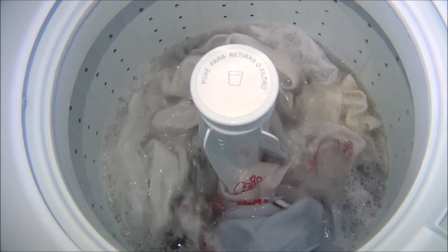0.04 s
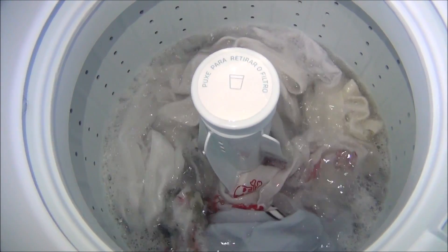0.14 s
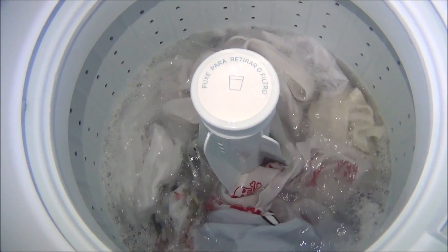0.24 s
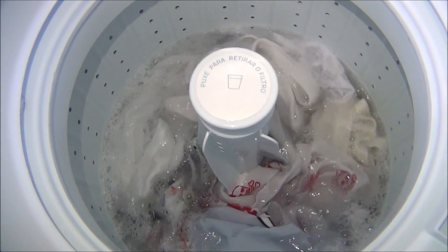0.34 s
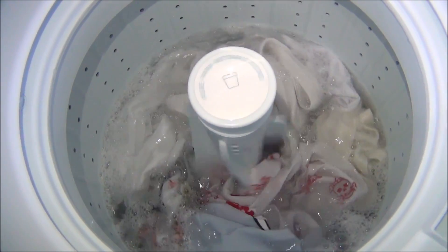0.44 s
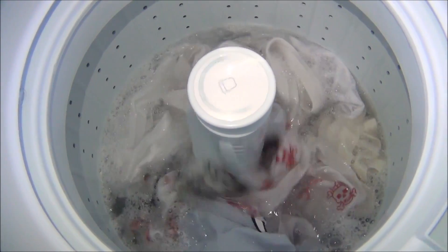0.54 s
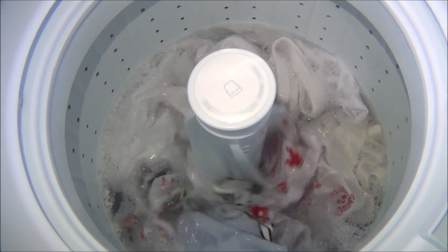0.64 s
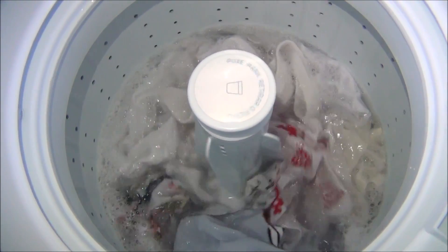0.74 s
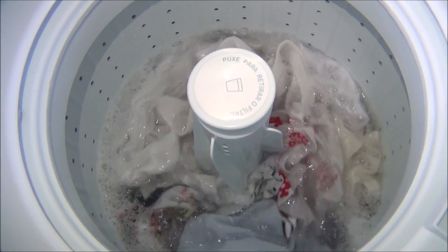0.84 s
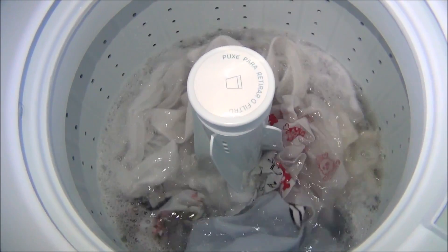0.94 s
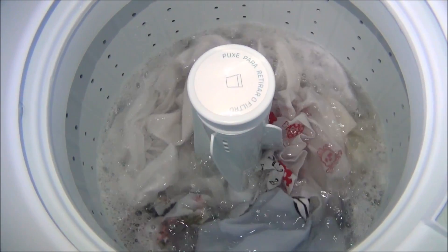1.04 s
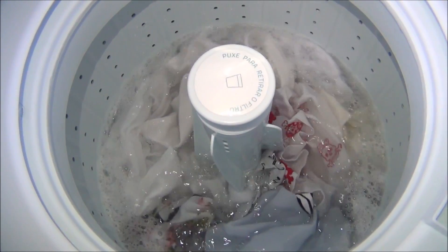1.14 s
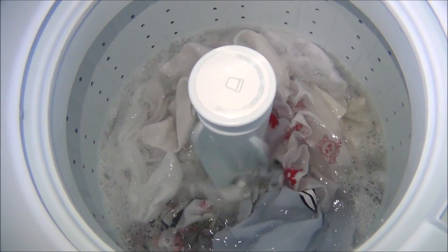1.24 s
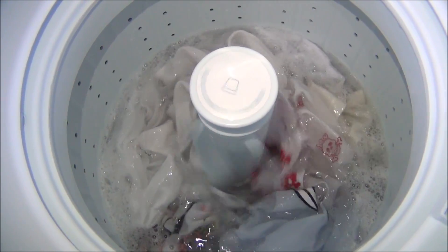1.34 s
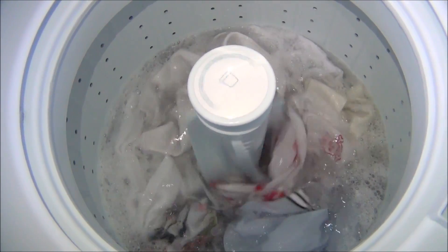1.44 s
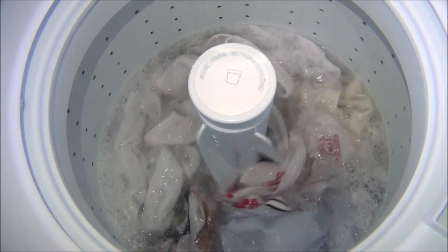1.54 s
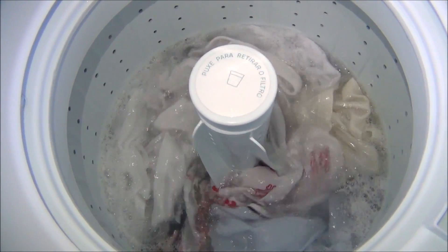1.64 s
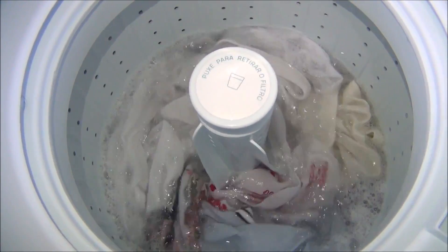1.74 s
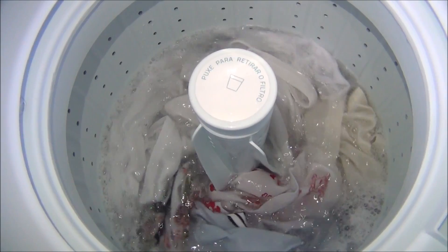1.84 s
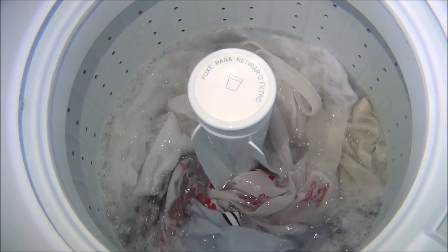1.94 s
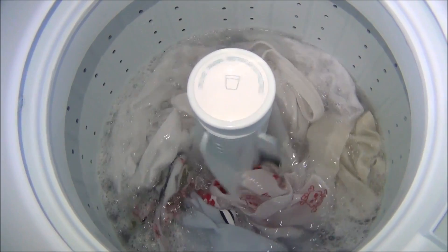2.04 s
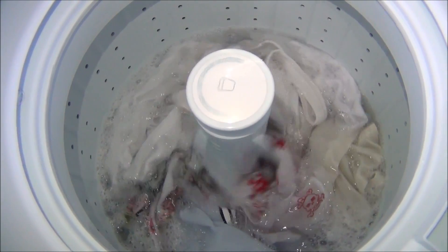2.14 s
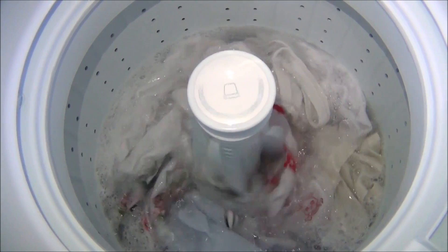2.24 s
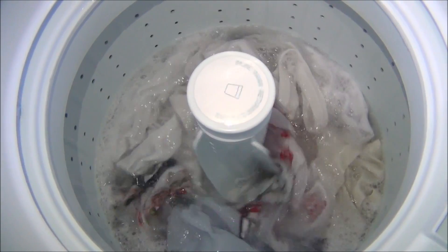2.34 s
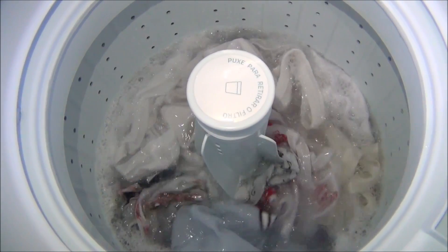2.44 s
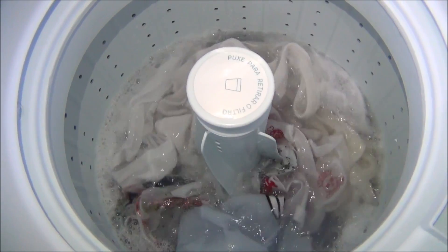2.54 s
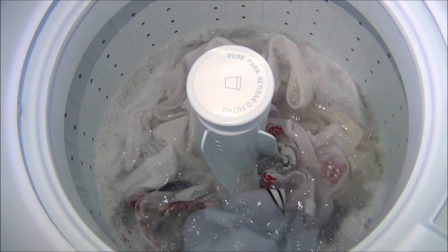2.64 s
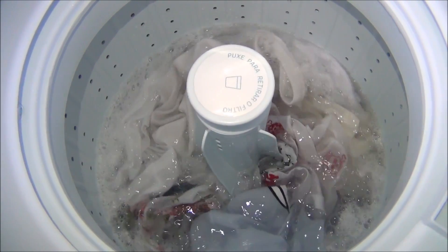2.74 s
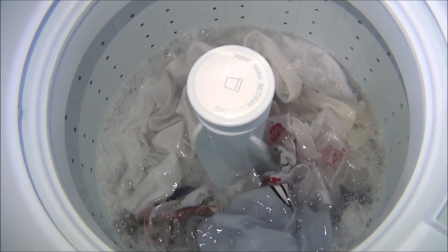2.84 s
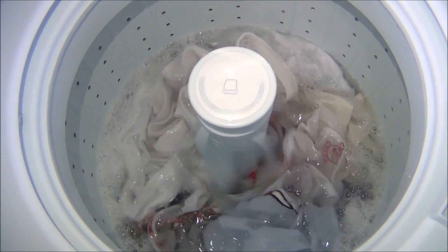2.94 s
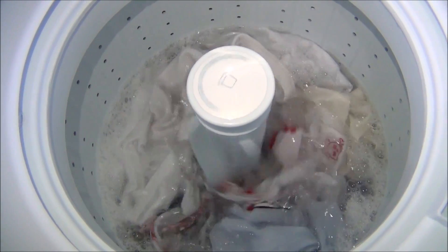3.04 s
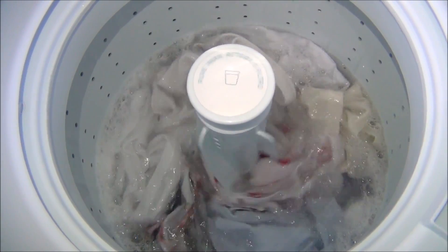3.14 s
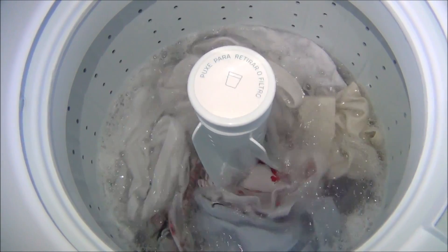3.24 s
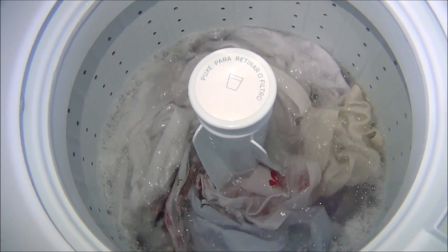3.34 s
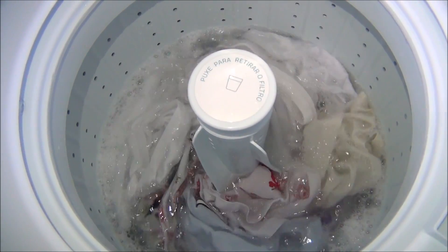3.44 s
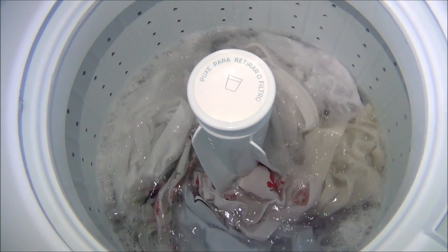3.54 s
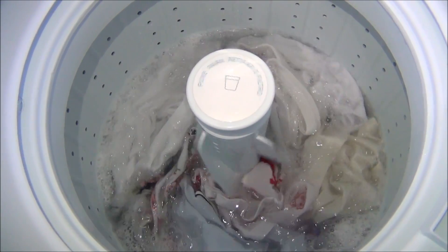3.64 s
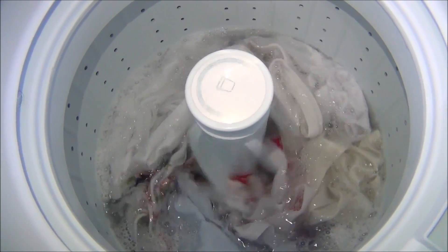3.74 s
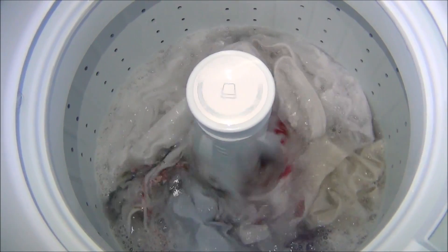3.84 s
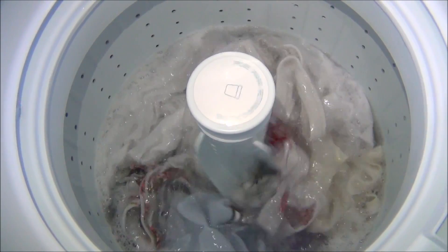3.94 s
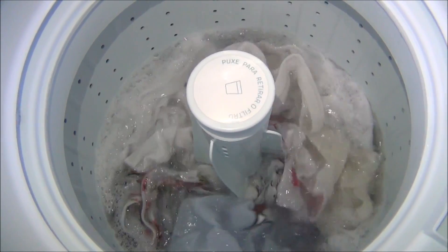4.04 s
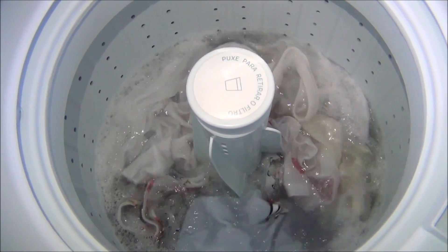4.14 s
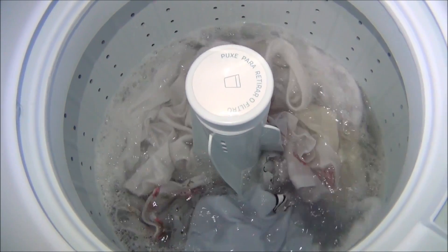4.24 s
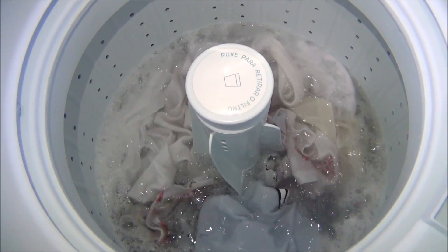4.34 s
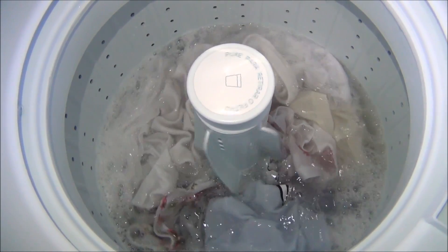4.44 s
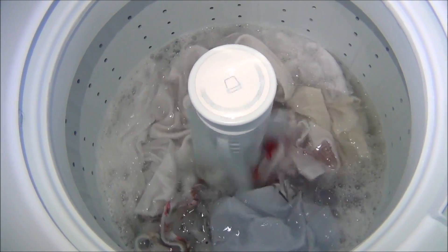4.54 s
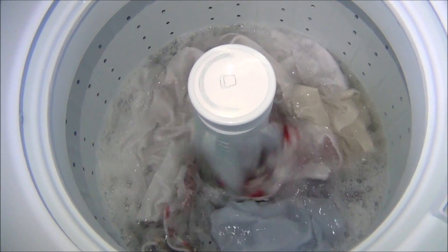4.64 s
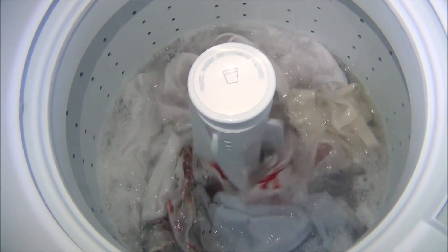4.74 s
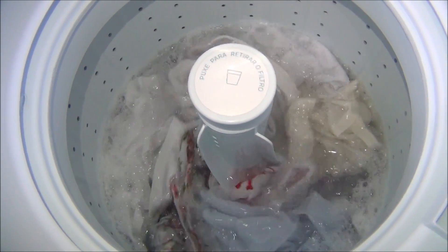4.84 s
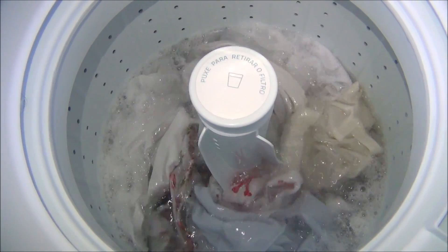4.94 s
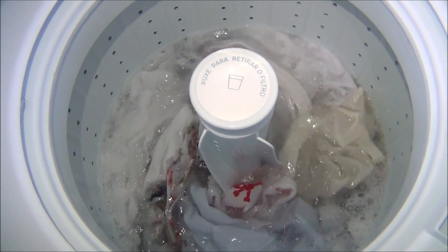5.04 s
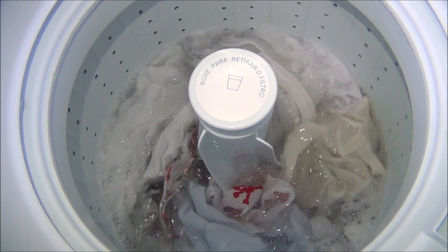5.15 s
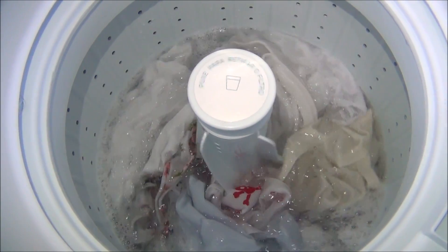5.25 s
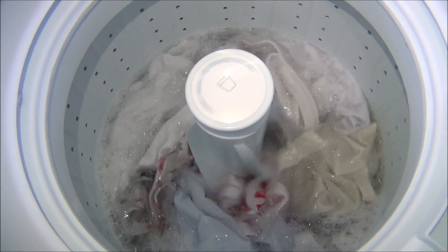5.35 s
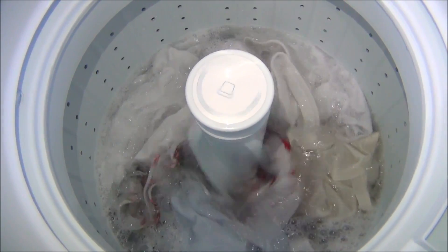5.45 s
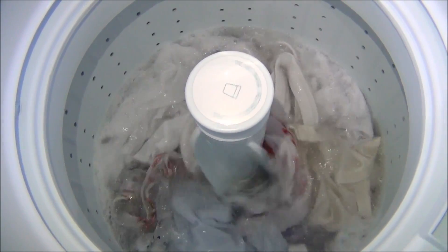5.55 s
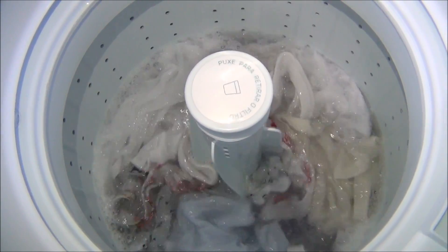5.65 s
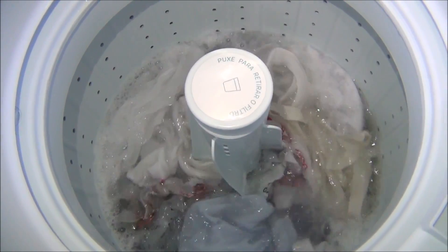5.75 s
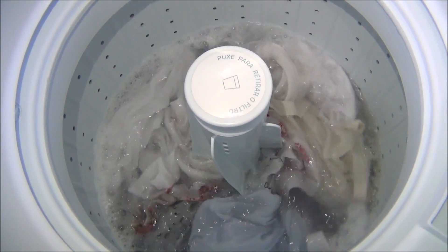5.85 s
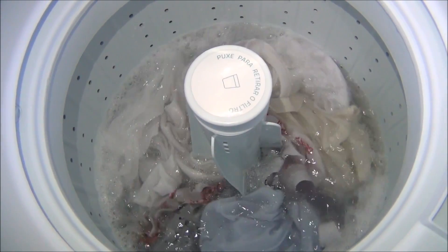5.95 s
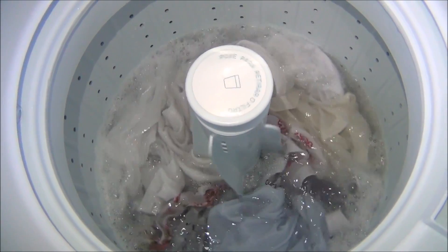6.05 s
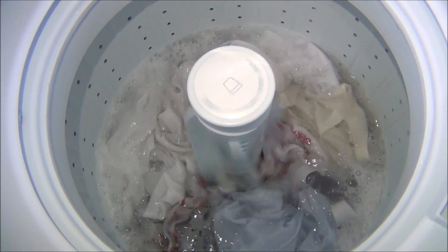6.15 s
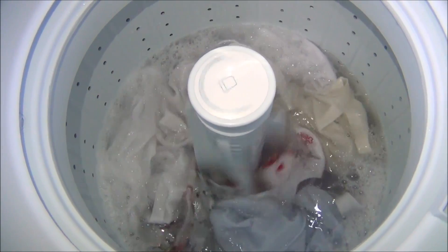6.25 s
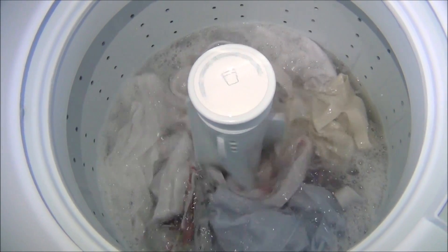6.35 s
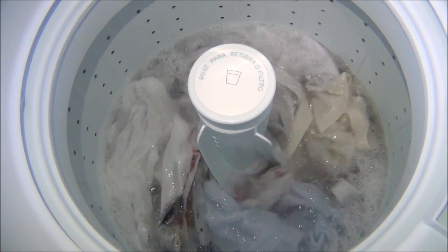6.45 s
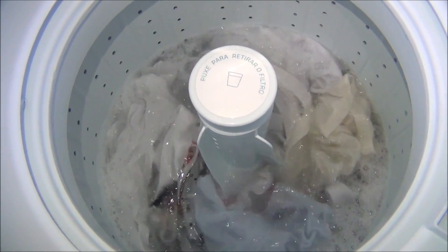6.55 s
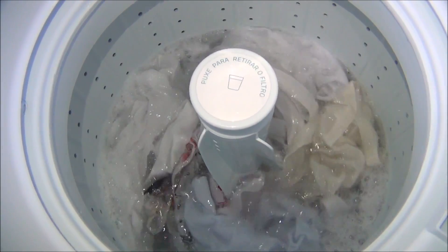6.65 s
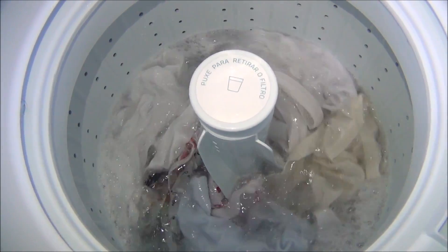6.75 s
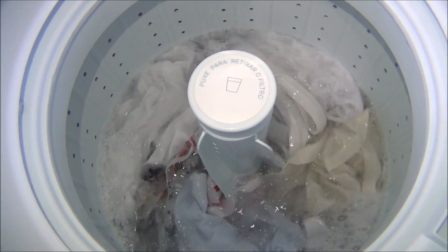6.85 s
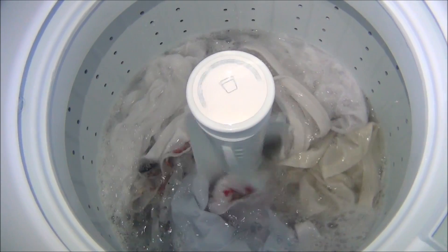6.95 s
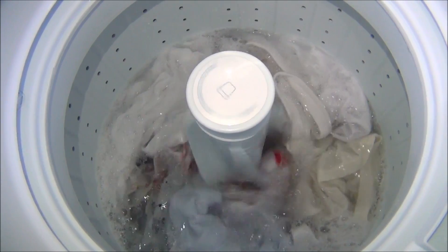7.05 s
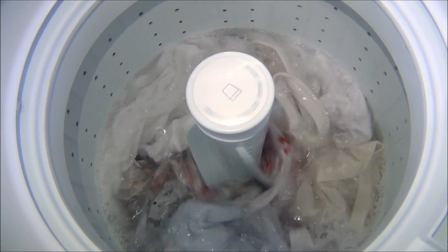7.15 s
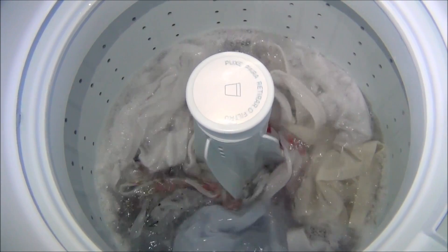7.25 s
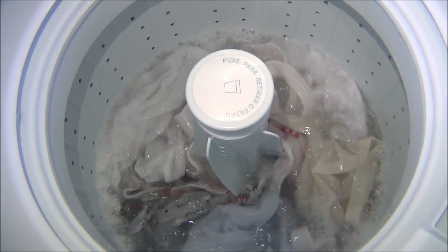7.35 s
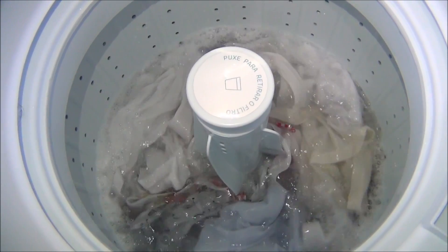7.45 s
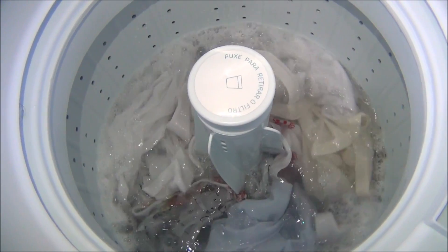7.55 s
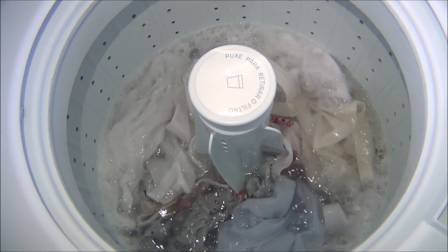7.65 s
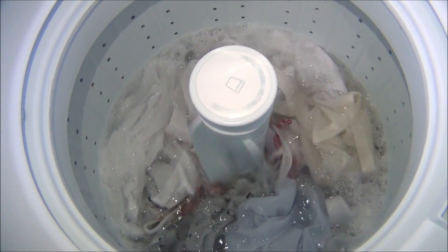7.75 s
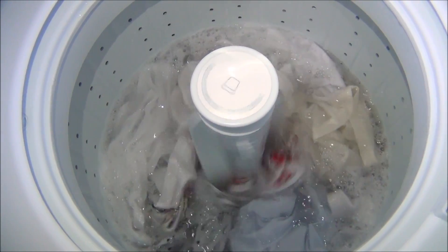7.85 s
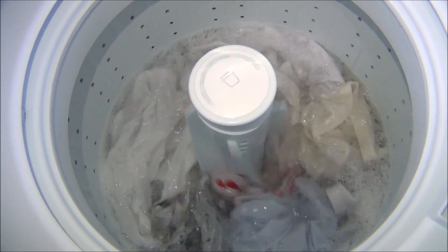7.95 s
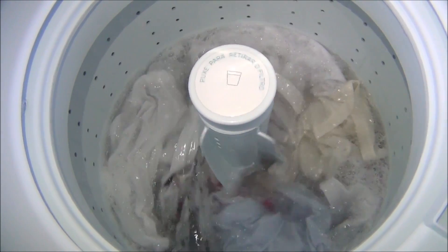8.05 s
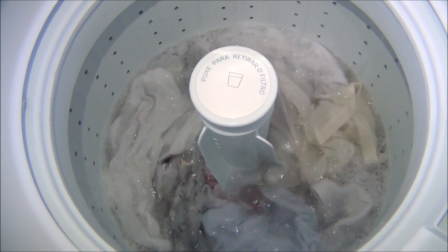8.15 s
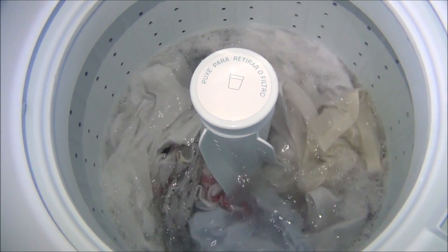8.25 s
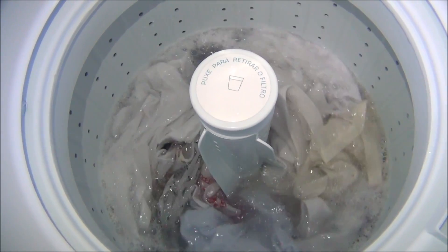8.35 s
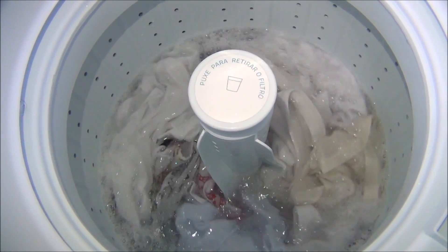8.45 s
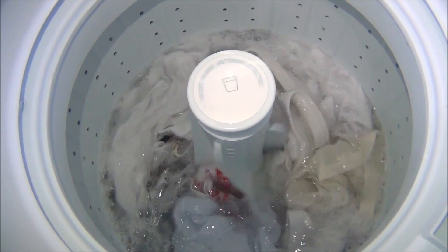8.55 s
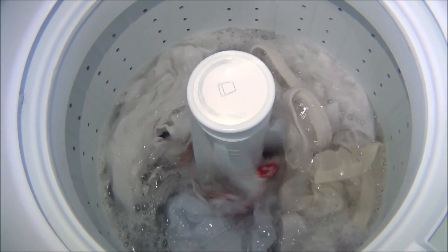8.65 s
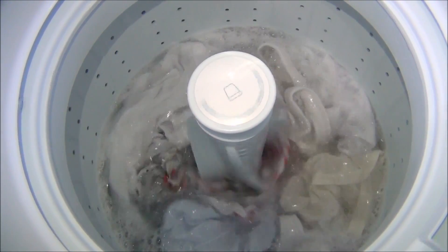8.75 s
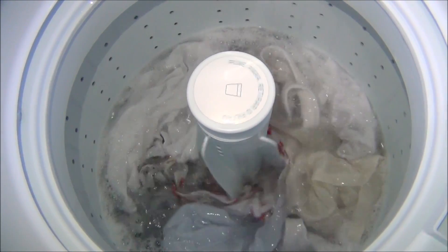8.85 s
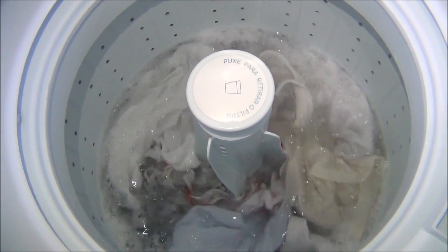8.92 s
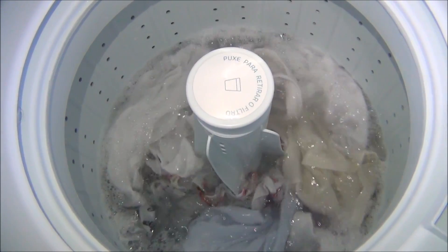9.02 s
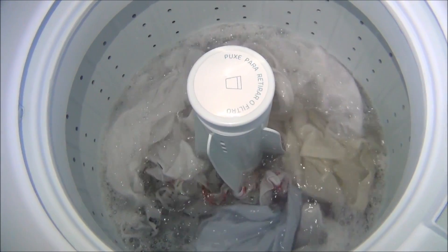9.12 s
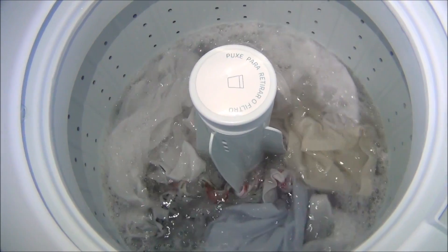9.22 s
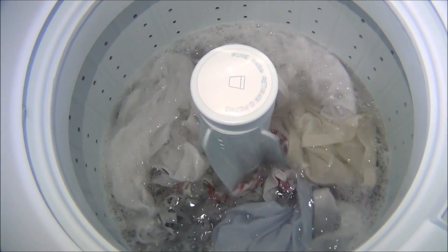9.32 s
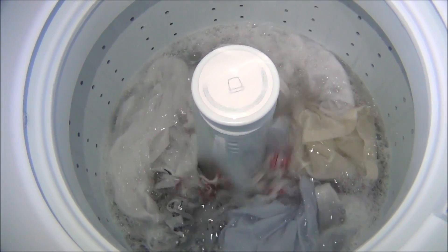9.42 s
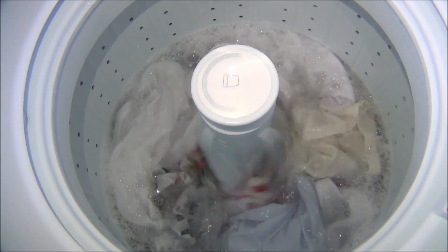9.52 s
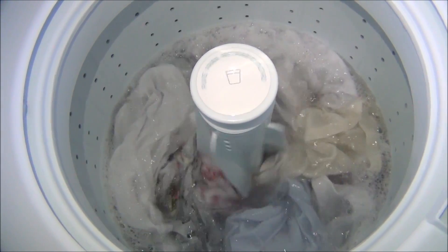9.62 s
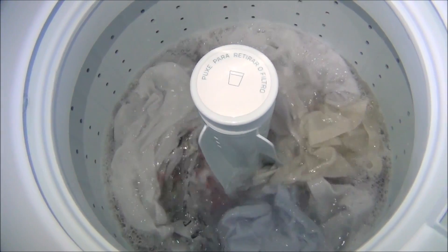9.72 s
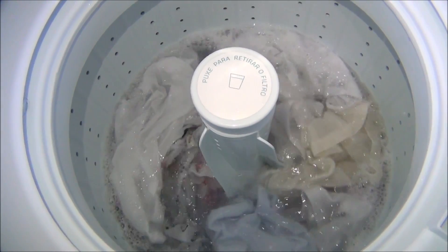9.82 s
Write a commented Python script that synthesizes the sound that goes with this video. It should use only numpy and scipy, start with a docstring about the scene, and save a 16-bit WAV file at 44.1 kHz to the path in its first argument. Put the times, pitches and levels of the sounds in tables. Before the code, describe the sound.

A top-loading washing machine swishes clothes back and forth, each stroke bringing a motor growl and a splashing, gurgling surge of water.

```python
"""Just above the open tub of a top-loading washing machine, as it swishes a load of clothes.
Every 0.8 s the motor kicks in and swings the agitator (the paddle in the middle) the other way.
The drive growls, and gulps of air boom in the tub as it bounces on its springs. Then a wave breaks
over the cloth in ringing bubbles and spray, wet cloth slaps, and the water trickles back."""
import sys
import numpy as np
from scipy import signal
from scipy.fft import rfft, irfft, next_fast_len
from scipy.io import wavfile
from scipy.ndimage import map_coordinates

SR = 44100
rng = np.random.default_rng(int(sys.argv[2]) if len(sys.argv) > 2 else 0)


def dump_mix(stems):
    """Bounce the given channels to the path in sys.argv[1] as a 16-bit WAV at rate SR."""
    frames = np.atleast_2d(stems).T  # one column per channel
    limited = np.clip(frames, -1, 1)  # hard clip at full scale
    pcm = np.round(limited * 32767).astype(np.int16)
    wavfile.write(sys.argv[1], SR, pcm)


N = 435708

# Levels in the tables are relative: each source sets its overall loudness later.
# Each swing of the agitator: start_s, knock_db, drive_db, churn_db, breaks_after_s, collapses_after_s,
# wave_db, backwash_db, trickle_db
STROKES = [(-.38, 0, 0, 1.5, .18, 0.34, 2.5, 1, 8), (.429, 3.5, -1, 1, 0.21, 0.36, 0, -3, 1),
           (1.234, 2, -2.5, 1, 0.18, 0.34, -1.5, 1, 6.5), (2.049, -2, -0.5, 2.5, 0.19, 0.36, .5, 1.5, 4.5),
           (2.859, 1, -1.5, 1.5, .18, 0.37, -1, 3, 3), (3.663, -3, 1, 1.5, 0.21, 0.35, 1, -.5, 1),
           (4.483, 2.5, -3, 2, 0.18, .36, 0, 3, -2), (5.291, -2, -0.5, 1.5, 0.2, 0.36, 0.5, 0, 0),
           (6.096, 1, -2, 2.5, .175, .37, -1, 3.5, 3.5), (6.914, 5.5, 0, 1.5, 0.21, 0.35, 1, -2, -8),
           (7.731, 7, -2, 0.5, 0.19, 0.32, 0.5, 2, -6), (8.538, 4, -2, .5, 0.21, .37, 0, 0.5, -7),
           (9.35, .5, -.5, 0, 0.17, 0.35, -2, -0.5, 0)]
# The tone of the bubbles, the spray and the water draining through cloth: pitch_hz, level_db
BUBBLE_TONE = [(300, -45), (880, -12.5), (1150, -1.5), (1450, -1), (1700, 4), (2000, -1.5), (3000, 0),
               (4200, -9.5), (6500, -28), (12000, -50)]
SPRAY_TONE = [(1000, -27), (2500, -1.5), (4200, -2), (5500, -2), (7500, -5), (11500, -2), (14000, -6),
              (16000, -8.5)]
TRICKLE_TONE = [(400, -10), (900, -1), (1400, -8), (1720, 3), (2100, -4), (3000, -10), (6000, -24),
                (14000, -30)]
# How the full tub, its springs and the air above the water ring: pitch_hz, width_hz, level_db
TUB_RINGS = [(155, 16, -5.5), (268.5, 12.8, 0.5), (353.9, 11, 6), (447.6, 25, -6.5), (512.5, 45, -6.5),
             (596, 80, -8.5), (773, 78, -6.5), (1070, 130, -23)]
SPRING_RINGS = [(70.7, 10.2, 3), (94, 5.1, 3), (123, 11, -1)]
AIR_RINGS = [(1230, 50, -26), (1746, 13, 3), (2046, 33, 0.5), (2760, 79, -29)]
# The gears through one stroke: after_start_s, rattle_db, whine_db, whine_hz
GEARS = [(-.003, -44, -72, 333.3), (.001, -28, -38, 351.5), (.04, -28, -30, 458.7),
         (.095, -24.5, -19, 471.8), (.14, -18, -44, 503.9), (.2, -22.5, -24.5, 686.7),
         (.27, -20, -22.5, 720), (.33, -38, -52, 614), (.7, -71, -90, 301.4)]
GROWL_TONE = [(60, -38), (110, -22), (170, 6.5), (210, -24), (270, -4), (480, 5), (620, 0.5), (930, -2),
              (1080, -10), (2000, -21), (4000, -39), (9000, -40)]  # the rattling gears: pitch_hz, level_db
SLAPS = [(0.0223, -5.5, 2440, -13), (.814, -7.5, 2830, 4), (0.8847, -11, 1800, -29),
         (.943, -8.5, 2230, -4.5), (1.3645, -4, 1530, -7), (1.7048, -15, 3120, -14), (2.221, -4.5, 4050, 1),
         (2.488, -9, 1710, -5), (2.991, -2.5, 2320, -20), (3.3982, -1.5, 2780, -9), (4.143, -13, 3060, -5),
         (4.206, -12, 1600, -22), (4.565, -21, 1425, -10), (4.6329, -5, 1280, -9), (5.09, -12.5, 1670, -10),
         (5.463, -20, 1360, -10), (5.6945, -6, 1650, -1), (5.7603, -8.5, 1710, -4),
         (6.1807, -22, 1020, -10), (6.3987, 3, 3340, -23), (6.573, -9, 1760, -22),
         (6.5987, -7.5, 2800, -25), (7.087, -2.5, 5280, -16), (7.896, -6, 1700, -15),
         (8.207, -10, 1600, -20), (8.216, 1.5, 2130, -23), (8.258, -7, 2640, -18),
         (9.0149, -15.5, 5600, 5.5), (9.0518, -13.5, 3990, 4), (9.832, -14, 3080, -21)]  # wet cloth or the agitator's vanes smacking the water (the vanes at 1.3645, 2.221, 4.6329 and 7.087 s): start_s, level_db, pitch_hz, extra_spray_db
PLOPS = [(0.0262, -5, 2490), (.615, -11.5, 1790), (.6375, -6, 3100), (0.742, -4.5, 1520),
         (1.3734, -10, 1440), (1.5704, -10, 1860), (1.5855, -6.5, 2600), (2.263, -4, 1790),
         (2.3345, -1.5, 1430), (2.373, -3.5, 1540), (3.079, -1, 3010), (3.1051, -4.5, 2325),
         (3.183, -0.5, 1636), (3.211, -6, 2000), (3.852, -9, 3380), (4.0158, -7, 1440), (4.144, -11, 3040),
         (4.7948, -1, 1660), (4.9847, -16, 2520), (5.5685, -5, 1500), (6.3164, -4, 1610), (6.351, 1, 1774),
         (6.3842, 1, 1740), (7.158, -5.5, 1205), (7.1843, 1, 1690), (7.236, -4, 3990), (7.3155, -6, 1670),
         (8.017, -1, 1590), (8.0335, -1, 1700), (8.2185, -6, 2160), (8.763, -2.5, 1660),
         (9.7306, -12, 1600)]  # single big bubbles: start_s, level_db, pitch_hz
WALL_DROPS = [(1.364, -0.5), (2.221, 5), (3.0383, 3), (3.1988, 5), (3.4028, 2.5), (4.1984, -2.5),
              (4.634, 7.5), (5.4628, 5), (5.6955, 6), (8.9567, -5), (9.535, 6)]  # drops hitting the plastic wall: start_s, level_db
# Air pockets, as the vanes scoop and water falls back: peak_after_s, fade_s, level_db, pitch_hz, width_hz
GLUGS = [(0.184, 0.022, -24, 272, 28), (0.184, 0.036, -24, 400, 29), (0.2, 0.037, -30.5, 89, 23),
         (0.31, 0.045, -26, 355, 16), (0.486, 0.057, -34.5, 157.5, 27.5), (0.37, 0.064, -43.5, 1700, 65),
         (0.57, 0.058, -40, 1700, 78)]
ECHO_TIMES = [(200, 0.63), (1000, 0.075), (1700, 0.11), (3000, 0.1), (12000, 0.033)]  # how long the drum's echo takes to fade by 60 dB: pitch_hz, fade_s
ROOM_TONE = [(12, -23), (23, 2.5), (36, -12), (52, -23), (72, -9.5), (125, -10.5), (200, -15), (600, -16),
             (1000, -24.5), (1750, -26), (2400, -32), (4200, -38), (16000, -38.5)]  # the quiet room: pitch_hz, level_db
# Stereo width. "Mid" is what both ears share, "side" is how they differ: pitch_hz, side_gain_db
STEREO_WIDTH = [(30, -19), (90, -16.5), (250, -11), (550, -11), (1500, -13.5), (4000, -14), (9000, -11.5)]
LEFT_LEAD = [(0, 0.057), (260, 0.12), (780, 0.64), (1120, 0.68), (2500, 0.13), (16100, 0.34)]  # how far the left channel runs ahead of the right: pitch_hz, lead_radians


def wave():
    """A wave folds air into ringing bubbles and throws spray, which thins to drips as it falls back."""
    since, *_, breaks, collapses, wave_db, backwash_db, trickle_db = stroke_clock()
    crest = amp(wave_db) * swell(since, breaks, collapses, rise_db_per_s=202, fall_db_per_s=183)
    # After the crest, the water runs back off the cloth.
    backwash = amp(backwash_db) * swell(since, 0.483, 0.51, rise_db_per_s=148, fall_db_per_s=98)
    fold_db_per_s = 19.5  # the breaking wave traps more and more air
    air = amp(fold_db_per_s * (np.clip(since, breaks, collapses) - (breaks + collapses) / 2))
    bubble_gain = np.hypot(amp(-20) * air * crest, amp(-34.5) * backwash)
    spray_gain = np.hypot(amp(-19.5) * crest, amp(-36.5) * backwash)
    bubbles = bubble_stream(900, low_hz=850, high_hz=5040, cycles=5.3, spread=4, rise=0.019, samples=1100)
    mist = bubble_stream(3500, low_hz=2480, high_hz=14970, cycles=4.7, spread=3.5, rise=0.033, samples=250)
    drops = bubble_stream(380, low_hz=3500, high_hz=15000, cycles=8, spread=5.3, rise=0.006, samples=600)
    sheet = bursts(per_s=97, fade_s=0.0075, base=0.46)
    dripping = bursts(per_s=45, fade_s=0.004, base=0.2)
    falling = np.clip((since - collapses) / 0.048, 0, 1)
    spatter = (1 - falling) * sheet + falling * dripping
    hiss = unit((mist + amp(3) * noise()) * spatter)
    body = coloured(bubbles + noise() * spatter, BUBBLE_TONE)
    spray = coloured(hiss + 0.5 * drops, SPRAY_TONE)
    trickle = coloured(noise() + amp(-8) * bubbles, TRICKLE_TONE) * amp(-54.5 + trickle_db)
    return body * bubble_gain + spray * spray_gain + trickle


def churn():
    """Gulps of air under the agitator's vanes boom in the tub, which bounces on its springs."""
    since, _, _, churn_db, *_ = stroke_clock()
    push = lambda t: swell(t, 0.22, 0.28, rise_db_per_s=48, fall_db_per_s=73.5)
    gulps = bubble_stream(350, low_hz=134.8, high_hz=1108, cycles=1.48, spread=0.5, rise=0.036,
                          samples=1500)
    jolt = amp(-15.5) * np.exp(-np.abs(since) / 0.051)  # changing direction shakes the tub
    boom = unit(resonate(gulps, TUB_RINGS)) * amp(-22.5) * (push(since) + jolt)
    lag_s, idle = 0.017, amp(-22)  # the bounce follows the push and never quite stops
    bounce = unit(resonate(noise(), SPRING_RINGS)) * amp(-32) * (push(since - lag_s) + idle)
    return (boom + bounce) * amp(churn_db)


def drive():
    """The motor hums at twice the mains rate while the gears rattle and wind up to speed."""
    since, knock_db, drive_db, *_ = stroke_clock()
    times, *columns = np.transpose(GEARS)
    rattle_db, whine_db, whine_hz = [np.interp(since, times, column) for column in columns]
    hum_phase = 2 * np.pi * 120 * np.arange(N) / SR
    clutch_db = knock_db * np.exp(-(since / 0.027) ** 2)  # the clutch takes up the slack with a knock
    pulsing = noise() * (1 + 0.25 * np.cos(hum_phase + wobble(30)))
    out = coloured(pulsing, GROWL_TONE) * amp(rattle_db + clutch_db + 2.6 * wobble(35))
    whine_phase = 2 * np.pi * np.cumsum(whine_hz * (1 + 0.01175 * wobble(50))) / SR
    whine = np.sin(whine_phase) * amp(whine_db + 2.3 * wobble(40))
    hum = (amp(-12.5) * np.sin(hum_phase) + amp(-9.5) * np.sin(3 * hum_phase)) * amp(rattle_db)
    out[0] += whine + hum
    return out * amp(drive_db)


def slaps():
    """Wet cloth, or a vane of the agitator, smacks the water: a trapped air pocket rings briefly, with a spit
    of spray."""
    out, t = np.zeros(N), np.arange(SR // 10) / SR
    attack = 1 - np.exp(-t / 0.0008)
    for start_s, level_db, pitch_hz, spray_db in SLAPS:
        pocket = noise_band(pitch_hz * 0.72, pitch_hz * 1.35, len(t)) * amp(-60 * t / 0.044)
        spit = noise_band(4000, 14000, len(t)) * amp(spray_db + 1.5 - 60 * t / 0.034)
        add(out, start_s, amp(level_db - 9) * attack * (pocket + spit))
    return out


def plops():
    """A big bubble swells, rings for a few milliseconds and rises a little in pitch."""
    out, t = np.zeros(N), np.arange(SR // 25) / SR
    age = t / 0.0028  # 1 at the loudest moment
    for start_s, level_db, pitch_hz in PLOPS:
        ring = np.sin(2 * np.pi * pitch_hz * t * (1 + 0.01 * age))
        add(out, start_s, amp(level_db) * age * np.exp(-age ** 2 / 2) * ring)
    return out


def wall_drops():
    """A drop hits the wall with a very short, bright tick."""
    out, t = np.zeros(N), np.arange(SR // 50) / SR
    for start_s, level_db in WALL_DROPS:
        tick = noise_band(6000, 14000, len(t))
        add(out, start_s, amp(level_db - 13.5 - 60 * t / 0.011) * tick)
    return out


def glugs():
    """Each air pocket swells and fades at its own moment of the stroke, never twice the same."""
    since, _, _, churn_db, *_ = stroke_clock()
    out = np.zeros(N)
    for peak_s, fade_s, level_db, hz, width_hz in GLUGS:
        band = signal.butter(2, (hz - width_hz / 2, hz + width_hz / 2), "band", fs=SR, output="sos")
        pocket = unit(signal.sosfilt(band, rng.standard_normal(N)))
        out += pocket * amp(level_db) * np.exp(-((since - peak_s) / fade_s) ** 2)
    return out * amp(churn_db)


def drum_echo(splashes):
    """The drum wall throws the splashes back; the moving load keeps changing the echo."""
    out = np.zeros((2, N + SR))
    block, delay = SR // 4, SR // 500  # a new echo every quarter second, arriving 2 ms late
    for start in range(0, N, block):
        hz, age, spectrum = signal.stft(rng.standard_normal((2, block)), SR, nperseg=256)
        fade = amp(-60 * age / at_pitch(ECHO_TIMES, hz)[:, None])
        tail = signal.istft(spectrum * fade, SR, nperseg=256)[1]
        tail /= np.linalg.norm(tail[0])
        echo = signal.fftconvolve(splashes[None, start:start + block], tail, axes=1)
        out[:, start + delay:][:, :echo.shape[1]] += echo
    return out[:, :N]


def room():
    """A faint, steady background; only its low rumble wanders in level."""
    wander_db = 2 * wobble(4)
    still = coloured(noise(), ROOM_TONE)
    rumble = filtered(still, lambda hz: hz < 100)
    return amp(-41.5) * (still + rumble * (amp(wander_db) - 1))


def bubble_stream(per_s, low_hz, high_hz, cycles, spread, rise, samples):
    """Bubbles as short rising notes, in mid and side. More spread makes a few of them stand out."""
    pitch, life, loudness, phase, onset, pan = rng.random((int(per_s * N / SR), 6)).T[:, :, None]
    hz = low_hz * (high_hz / low_hz) ** pitch
    turns = hz * np.arange(samples) / SR
    age = turns / (cycles * (0.5 + life))
    strength = amp(-spread * np.log(0.025 + loudness)) * np.sqrt(hz / low_hz)
    envelope = strength * np.exp(-age) * (1 - np.exp(-5 * age))
    ring = envelope * np.sin(2 * np.pi * (turns * (1 + rise * age) + phase))
    slots = ((onset * N).astype(int) + np.arange(samples)).ravel()
    return np.array([unit(np.bincount(slots, (ring * gain).ravel(), N)[:N]) for gain in (1, pan - 0.5)])


def stroke_clock():
    """For every sample: seconds since the motor started, then the other columns of that stroke."""
    t = np.arange(N) / SR
    starts, *columns = np.transpose(STROKES)
    stroke = np.maximum(np.searchsorted(starts, t - GEARS[0][0]) - 1, 0)
    return [t - starts[stroke]] + [column[stroke] for column in columns]


def swell(t, start_s, end_s, rise_db_per_s, fall_db_per_s):
    """A gain that climbs, holds at 1 from start to end, then sinks."""
    return amp(-rise_db_per_s * np.maximum(start_s - t, 0) - fall_db_per_s * np.maximum(t - end_s, 0))


def bursts(per_s, fade_s, base):
    """A gain that jumps at random moments and sinks back to a steady base."""
    kicks = (rng.random(N) < per_s / SR) * rng.random(N) ** 2
    return unit(base + signal.lfilter([1], [1, -np.exp(-1 / (fade_s * SR))], kicks))


def wobble(per_s):
    """A smooth curve through this many random points a second."""
    return map_coordinates(rng.standard_normal(int(N * per_s / SR) + 4), [np.arange(N) * per_s / SR])


def noise():
    """Two unrelated white noises: mid and side."""
    return rng.standard_normal((2, N))


def noise_band(low_hz, high_hz, samples):
    """A short hiss between two pitches."""
    band = signal.butter(2, (low_hz, high_hz), "band", fs=SR)
    return unit(signal.lfilter(*band, rng.standard_normal(samples)))


def resonate(x, rings):
    """Pass x through something that rings at several pitches, added with alternating signs."""
    return filtered(x, lambda hz: sum(
        (-1) ** k * amp(db) * 1j * hz * width / (pitch ** 2 - hz ** 2 + 1j * hz * width)
        for k, (pitch, width, db) in enumerate(rings)))


def coloured(x, tone):
    """Shape x with a tone table, at an average (rms) level of 1."""
    return unit(filtered(x, lambda hz: amp(at_pitch(tone, hz))))


def filtered(x, response):
    """Multiply each frequency in x by response(hz)."""
    size = next_fast_len(N + SR // 2)
    return irfft(rfft(x, size) * response(np.fft.rfftfreq(size, 1 / SR)), size)[..., :N]


def at_pitch(table, hz):
    """Read between a table's rows on a log pitch scale."""
    pitches, values = np.transpose(table)
    return np.interp(np.log(hz + 1), np.log(pitches + 1), values)


def add(track, start_s, sound):
    """Mix a short sound into a track."""
    part = track[max(round(start_s * SR), 0):][:len(sound)]
    part += sound[:len(part)]


def amp(db):
    """Turn decibels into a gain."""
    return 10 ** (np.asarray(db) / 20)


def unit(x):
    """Scale x to an average (rms) level of 1."""
    return x / np.sqrt(np.mean(x ** 2) + 1e-20)


def scene():
    """Mix water, machine and room as mid and side, then turn them into a narrow left and right."""
    water = wave()
    water[0] += slaps() + wall_drops()
    water += amp(-4.5) * resonate(water, AIR_RINGS)
    water[0] += plops()
    mid, side = water + amp(-9.5) * drum_echo(water[0]) + drive() + churn() + room()
    mid = mid + glugs()
    side = filtered(side, lambda hz: amp(at_pitch(STEREO_WIDTH, hz)))
    return np.array([mid + side, mid - side]) * amp([[-0.1], [0.1]])


def record(dry):
    """The left microphone runs slightly ahead; the tallest peaks are rounded and the top treble is cut."""
    shifted = filtered(dry, lambda hz: np.exp(0.5j * at_pitch(LEFT_LEAD, hz) * [[1], [-1]]))
    rounded = shifted / (1 + np.abs(shifted) ** 6) ** (1 / 6)
    return filtered(rounded, lambda hz: hz < 15950)


dry = scene()
out = record(dry)
dump_mix(out)
```